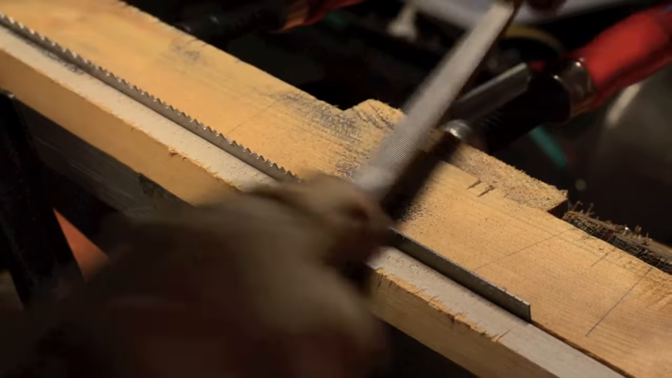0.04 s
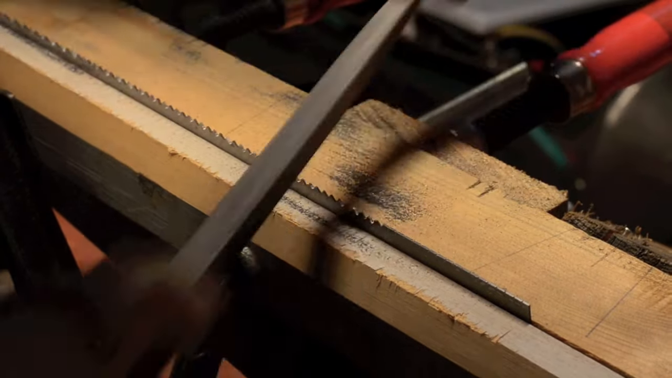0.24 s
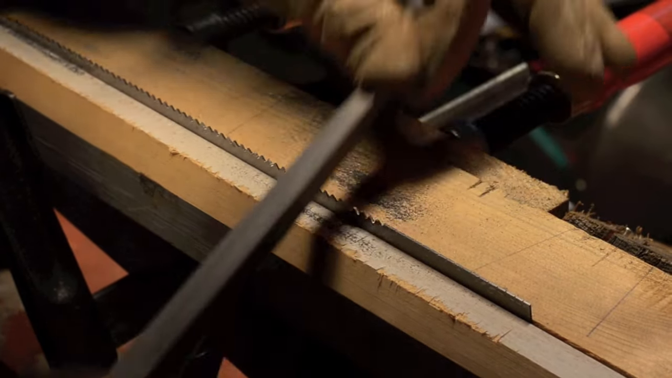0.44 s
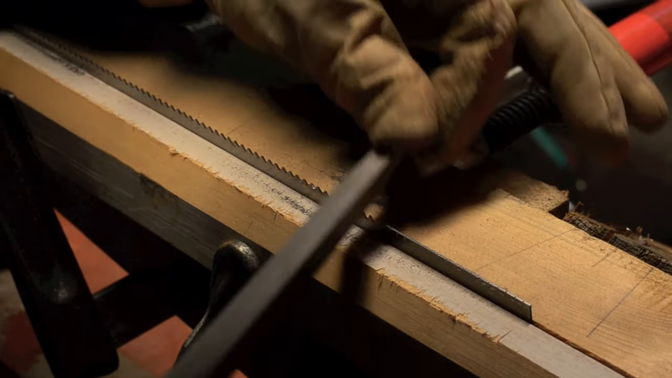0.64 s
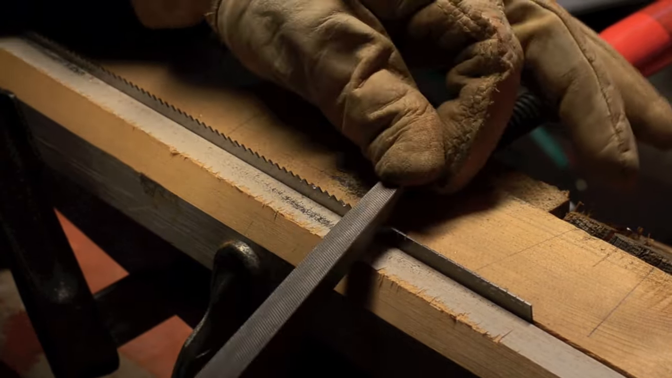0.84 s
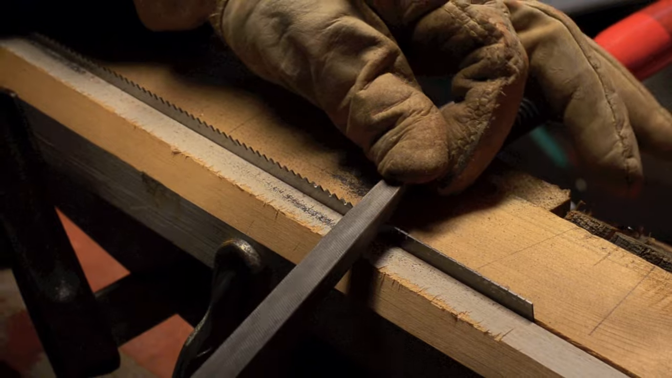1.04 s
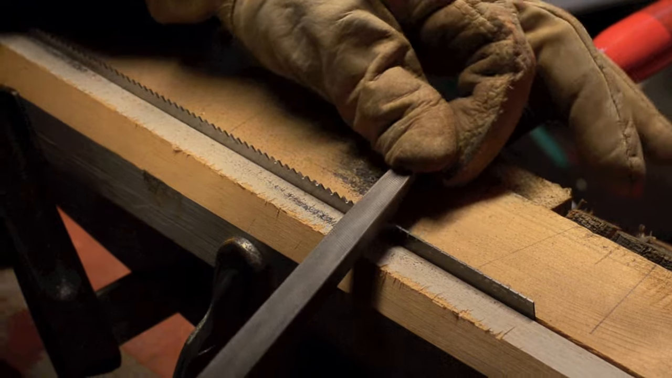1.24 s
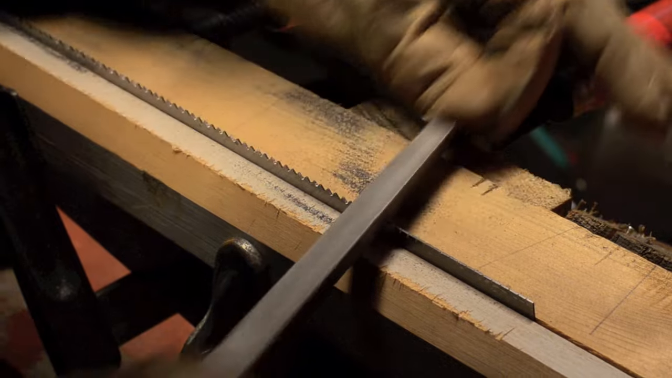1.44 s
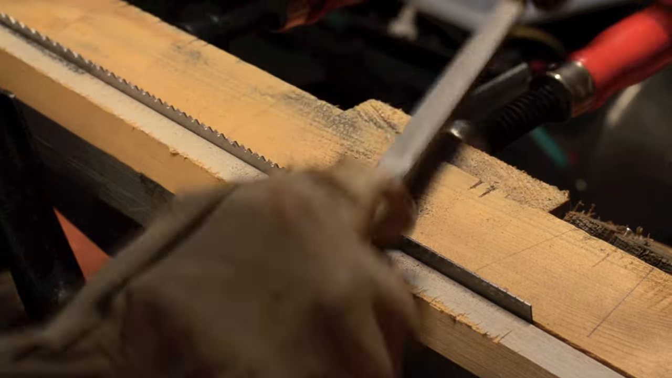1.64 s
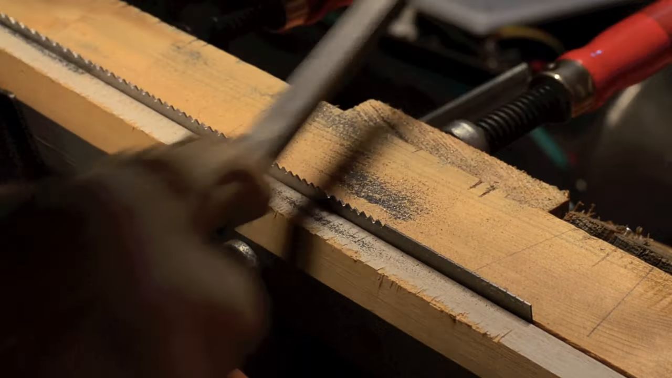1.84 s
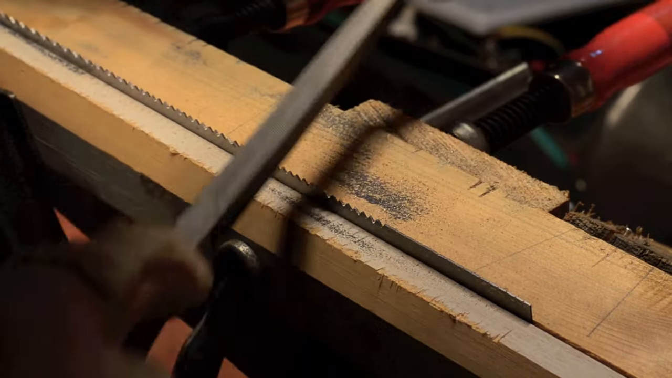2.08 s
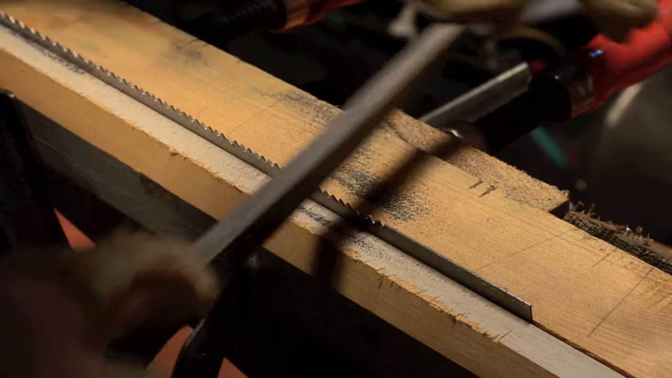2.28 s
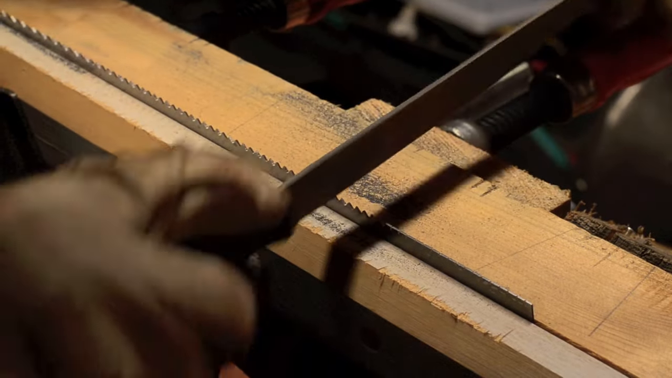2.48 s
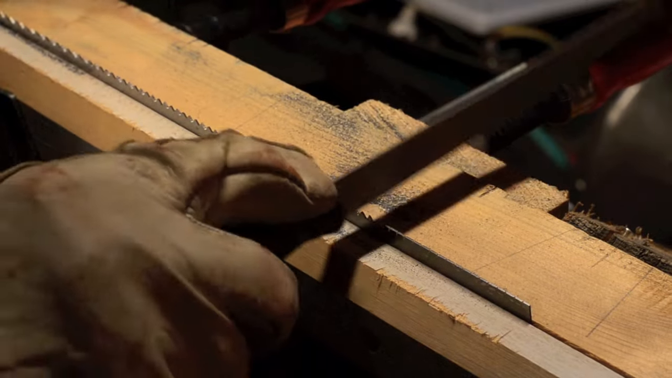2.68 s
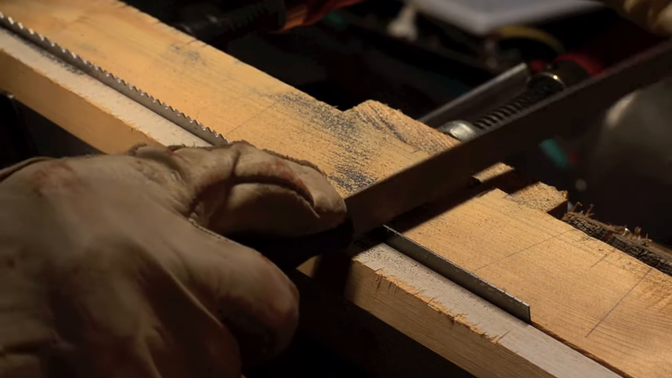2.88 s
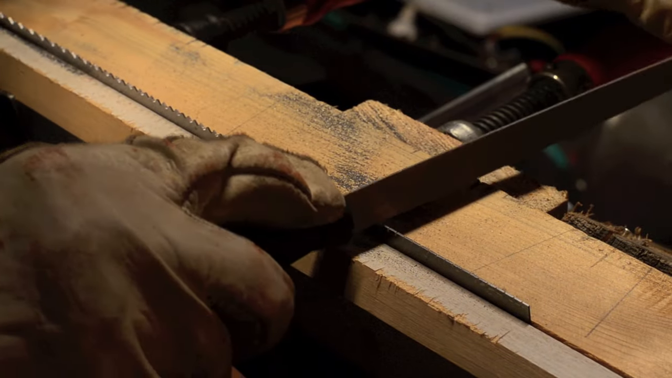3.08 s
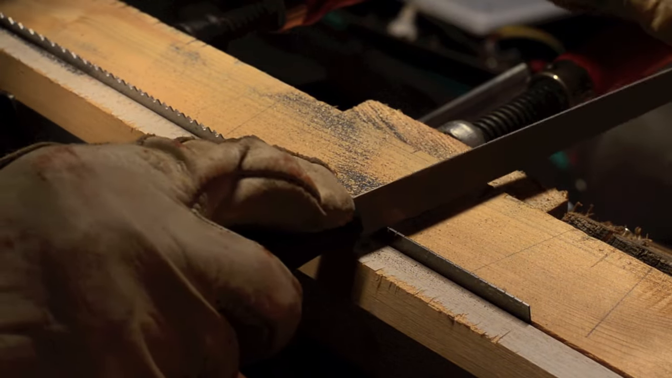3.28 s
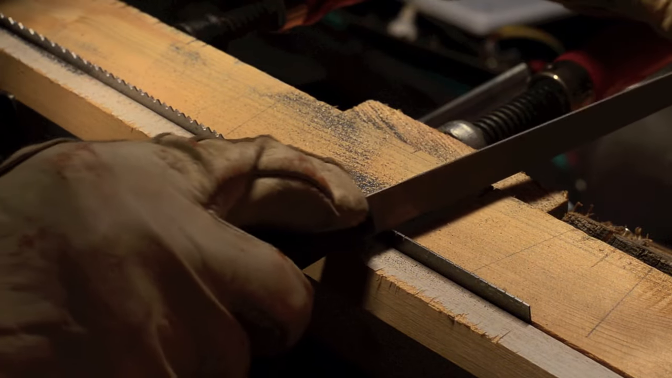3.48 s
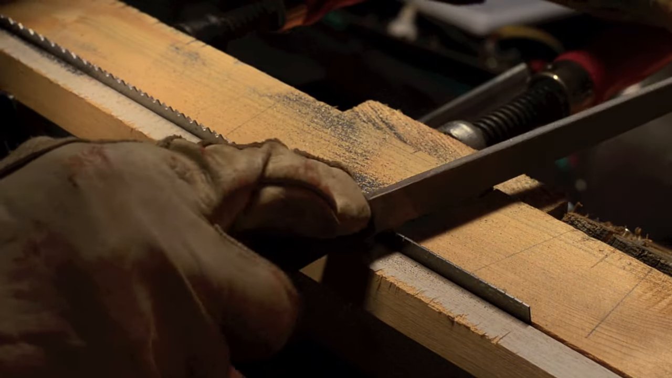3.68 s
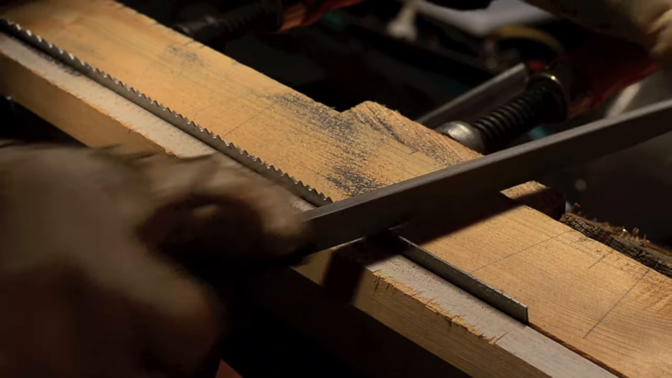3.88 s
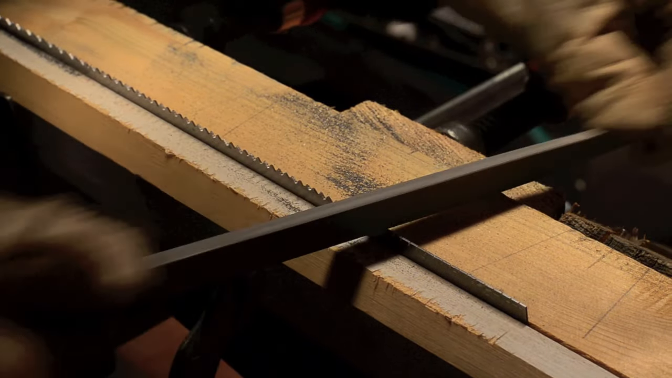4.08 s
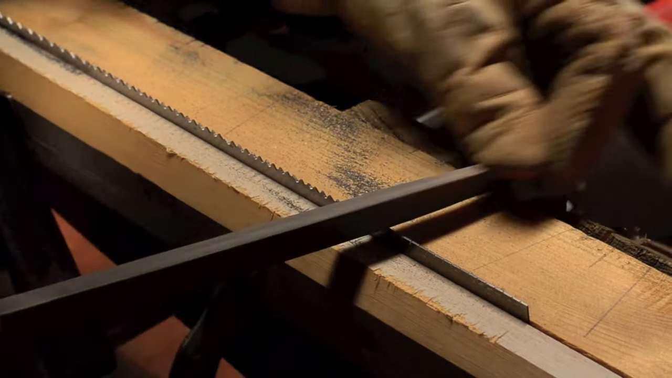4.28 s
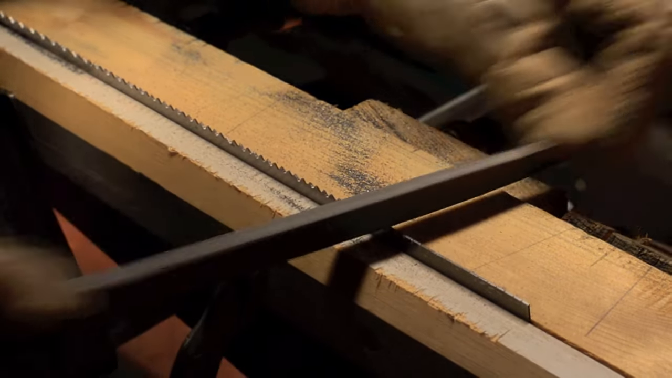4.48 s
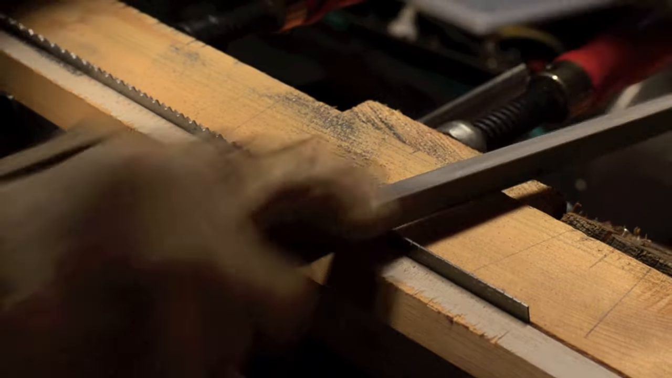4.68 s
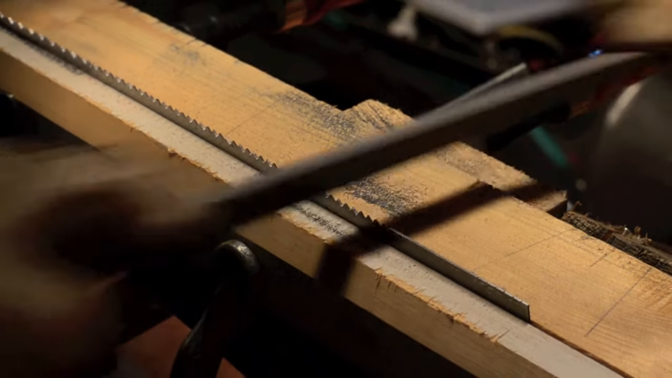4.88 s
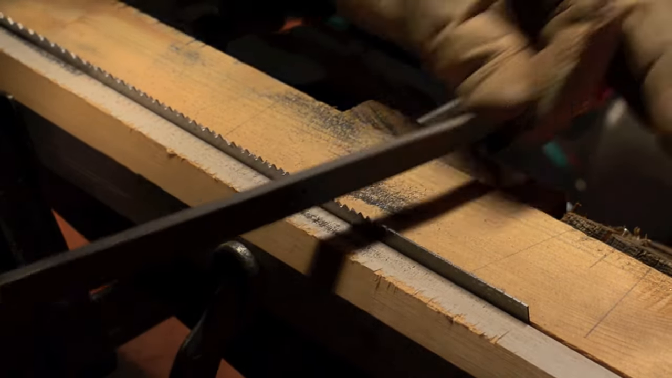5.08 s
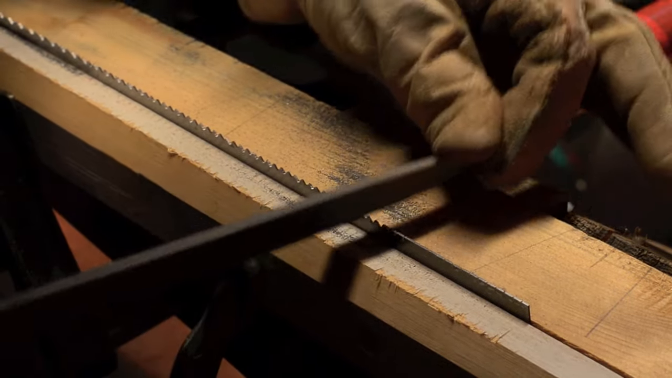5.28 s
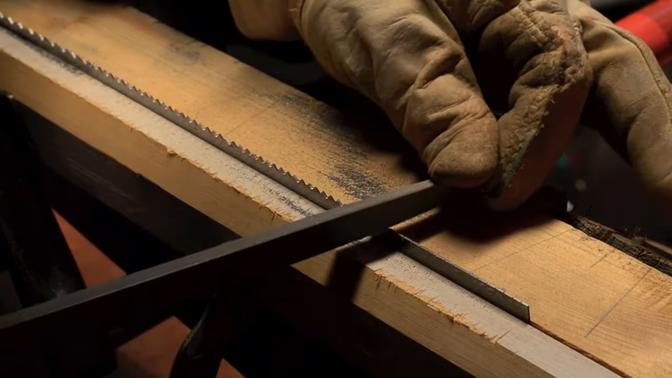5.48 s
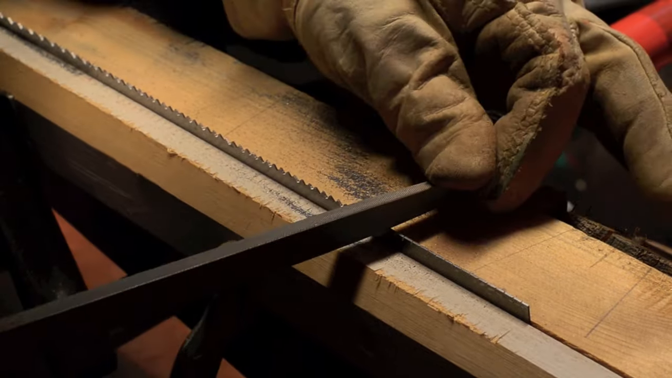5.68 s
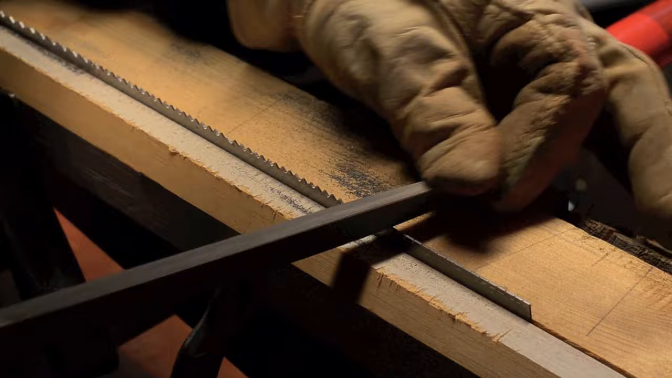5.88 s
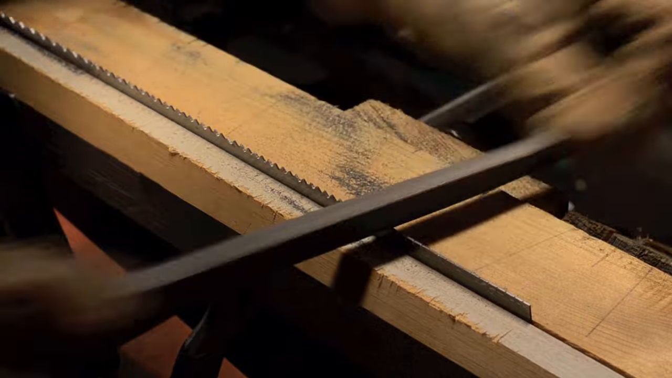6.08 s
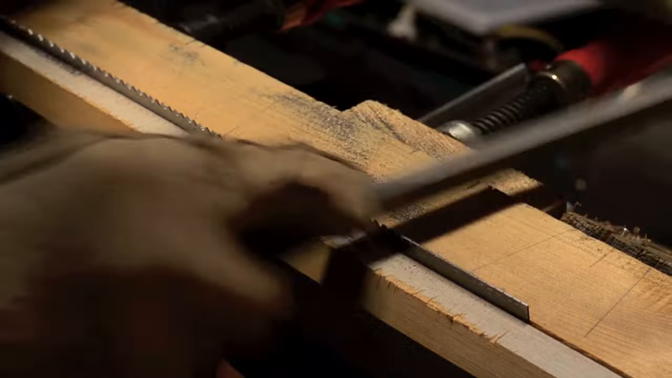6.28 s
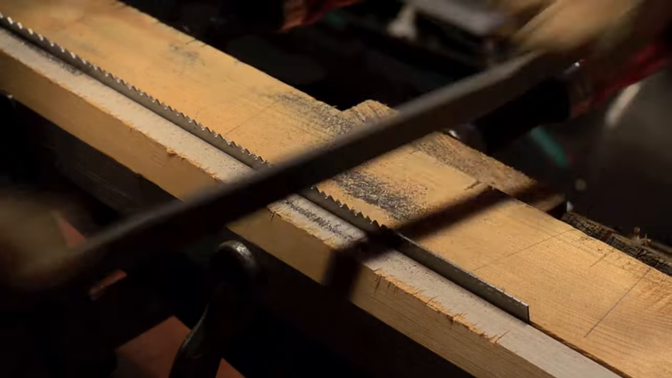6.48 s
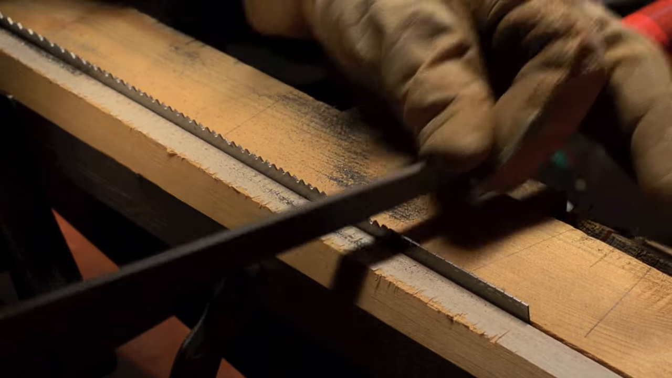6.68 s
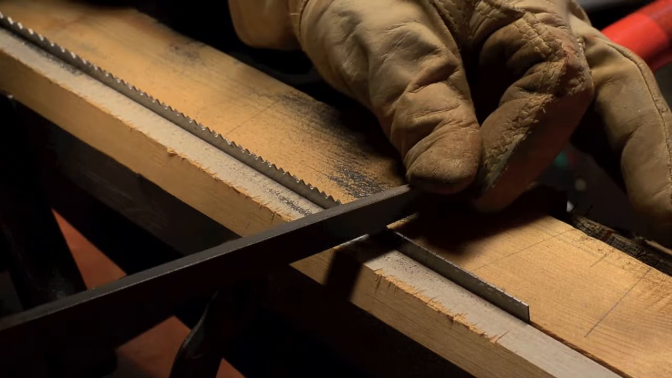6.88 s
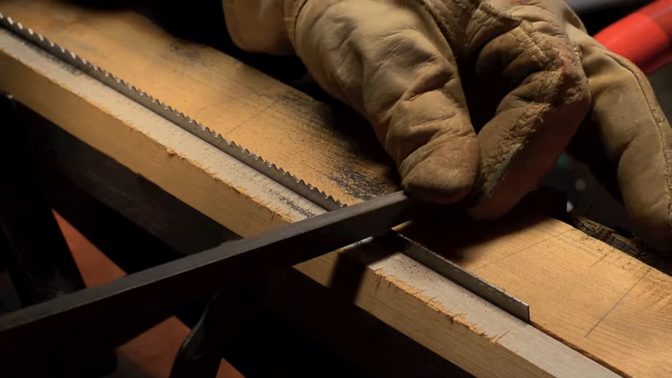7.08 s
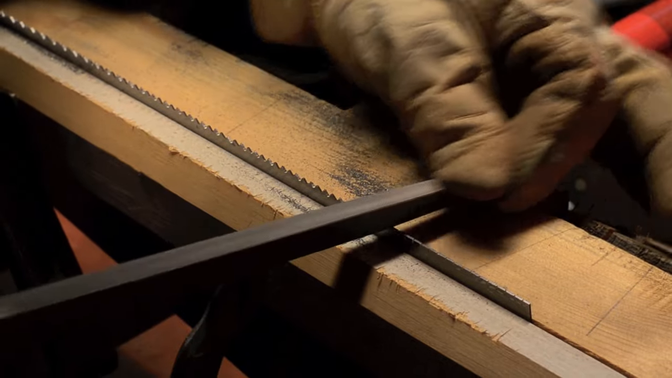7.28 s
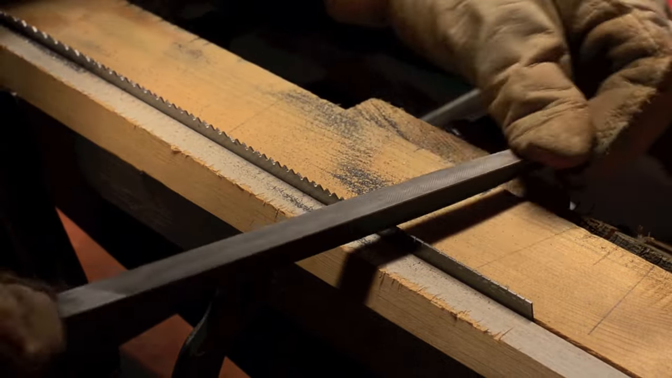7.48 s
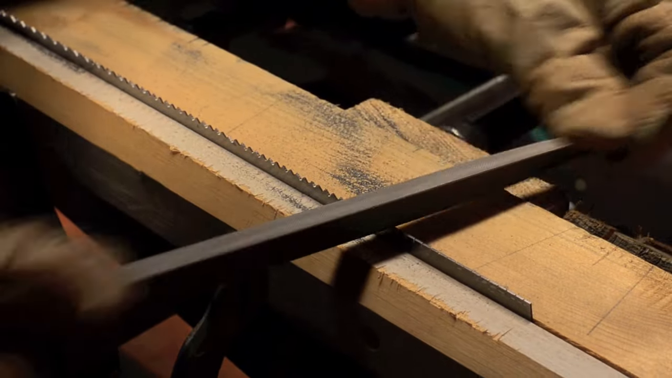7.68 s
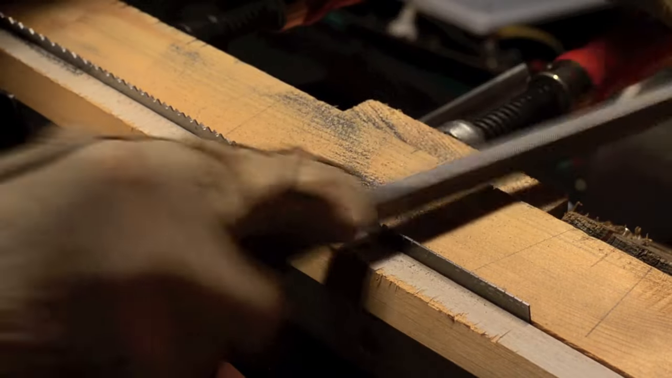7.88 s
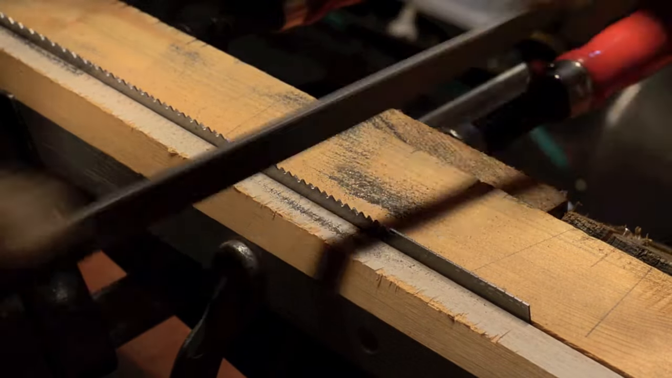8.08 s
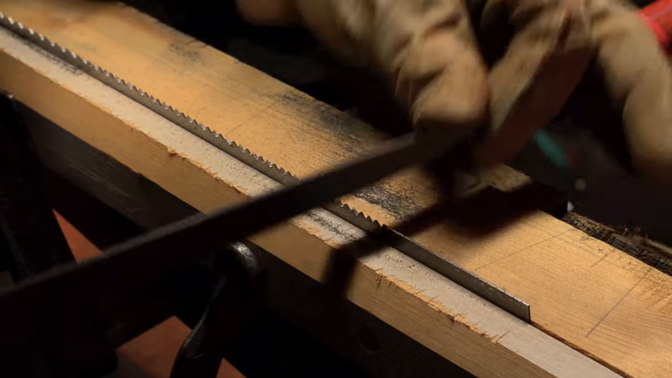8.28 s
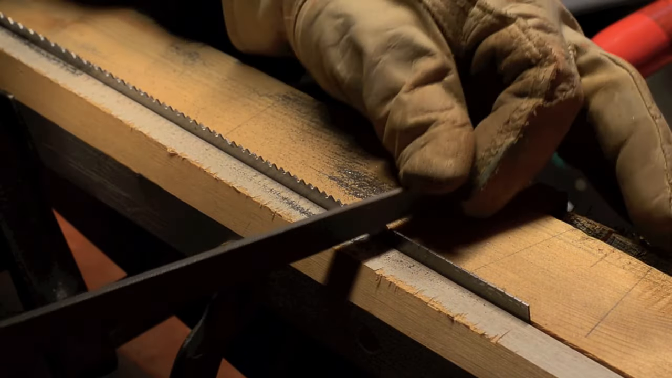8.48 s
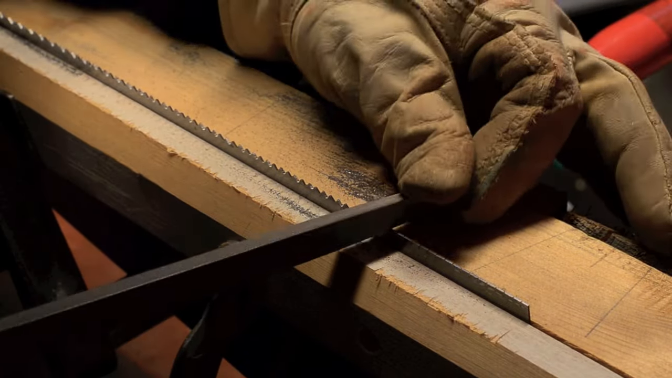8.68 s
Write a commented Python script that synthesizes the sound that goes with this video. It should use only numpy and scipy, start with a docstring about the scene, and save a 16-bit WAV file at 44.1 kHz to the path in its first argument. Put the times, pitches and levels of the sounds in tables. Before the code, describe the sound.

A hand file rasps in slow, separate strokes across a clamped saw blade, squealing at times, with small knocks between passes in a quiet workshop.

```python
"""A hand file works in slow strokes on a saw blade clamped between boards in a small workshop with faint air.
A short rasp opens the scene; knocks and catches then lead into a stroke at 1.4 s that squeals.
A glove rubs softly at 2.5 s, knocks follow, and two strokes come at 3.9 and 4.5 s; another starts at 5.9 s.
Three strokes follow closely from 7.3 s, and a last tap comes at 8.6 s.
Rasp is filtered bites, squeals are stick-slip tones, taps are ringing pushes and the glove is shaped noise."""
import sys
import numpy as np
from scipy import signal
from scipy.fft import rfft, irfft, next_fast_len
from scipy.io import wavfile
from scipy.ndimage import uniform_filter1d, minimum_filter1d

SR = 44100
rng = np.random.default_rng(int(sys.argv[2]) if len(sys.argv) > 2 else 0)


def unload_audio(sound):
    """Save the sound as a 16-bit wav file, at the path given as the first command line argument."""
    columns = np.transpose(np.atleast_2d(sound))
    # keep every value between -1 and 1, then stretch to whole-number steps
    steps = np.round(np.clip(columns, -1, 1) * 32767)
    wavfile.write(sys.argv[1], SR, steps.astype(np.int16))


N = 385427
TIME = np.arange(N) / SR   # seconds


def from_db(db):
    """Turn decibels into an amplitude factor."""
    return 10 ** (np.asarray(db) / 20)


def rms_one(x):
    """Scale a sound to rms 1."""
    return x / np.sqrt(np.mean(x ** 2) + 1e-20)


def at_hz(points, hz):
    """Read a table on a log-frequency axis."""
    known, value = np.transpose(points)
    return np.interp(np.log(np.maximum(hz, 1)), np.log(np.maximum(known, 1)), value)


def butter(x, hz, kind, order=2):
    """Smooth low, high or band filter."""
    sos = signal.butter(order, np.clip(hz, 10, .45 * SR), kind, fs=SR, output="sos")
    return signal.sosfilt(sos, x + 1e-18)


def drift(rate):
    """Random wander of rms 1, with changes up to about rate in Hz."""
    return rms_one(butter(rng.standard_normal(N), rate, "low"))


def gate(times, fade_s):
    """1 between the first and last time, with short ramps outside."""
    return np.clip(1 + np.minimum(TIME - times[0], times[-1] - TIME) / fade_s, 0, 1) ** 2


def colour(x, spectrum=((1, 0),), modes=()):
    """Causal (minimum-phase) filter from a broad spectrum and resonances."""
    size = 2 ** 13
    hz = np.fft.rfftfreq(size, 1 / SR)
    resonances = sum(db / (1 + (2 * (hz - f) / width) ** 2) for f, width, db in modes)
    cepstrum = irfft(np.log(from_db(at_hz(spectrum, hz) + resonances)))
    # folding the cepstrum forward puts all the response after the push
    cepstrum[1:size // 2] *= 2
    cepstrum[size // 2 + 1:] = 0
    response = irfft(np.exp(rfft(cepstrum)))
    return signal.oaconvolve(x, response)[:len(x)]


def register(x, pass_hz, core_hz):
    """One register of a sound, scaled to spread 1 in its core."""
    part = butter(x, pass_hz, "band", order=4)
    return part / np.std(butter(part, core_hz, "band", order=4))


SWELL_CURVE, EASE_CURVE = 1.98, 2.8   # exponents of the rise and fall in dB


def arch(start_s, swell_s, ease_s, swell_db, ease_db):
    """Level in dB around the peak of one push of the hand: it swells, rounds over and eases."""
    past_peak = TIME - start_s - swell_s
    before = np.clip(-past_peak / max(swell_s, 1e-3), 0, 1)
    after = np.clip(past_peak / max(ease_s, 1e-3), 0, 1)
    return -swell_db * before ** SWELL_CURVE - ease_db * after ** EASE_CURVE


# The tone of the room's air. Each row: frequency in Hz, relative strength in dB.
AIR = [(12, -29), (20, 0.5), (54, -14.5), (202, -6.5), (274, -13), (298, 0.5), (324, -17), (404, -3),
       (478, -12.5), (686, -6), (746, -9.5), (1580, -13.5), (15500, -38)]


def air(level_db=-70.5, side_db=-6.0):
    """The faint steady rush of the room is coloured noise, partly different at the two microphones."""
    mid, side = [colour(white, AIR) for white in rng.standard_normal((2, N))]
    return from_db(level_db) * (rms_one(mid) + from_db(side_db) * rms_one(side) * [[1], [-1]])


# How alike the echoes are at left and right. Each row: frequency in Hz, likeness where 1 is the same.
LIKENESS = [(60, 0.71), (300, 0.19), (1200, .84), (3000, .7), (6000, 0.07), (12000, 0.33)]


def stereo_bands(size):
    """Bands of diffuse noise at the two microphones: (centre in Hz, left and right)."""
    mid, side = rfft(rng.standard_normal((2, size)))
    hz = np.fft.rfftfreq(size, 1 / SR)
    edges = np.r_[0, np.geomspace(88, SR / 2, 17)]
    for low, high in zip(edges, edges[1:]):
        centre = (low + high) / 2
        alike = np.clip(at_hz(LIKENESS, centre), -1, 1)
        shared = np.sqrt((1 + alike) / 2) * mid
        opposed = np.sqrt((1 - alike) / 2) * side * [[1], [-1]]
        yield centre, irfft((shared + opposed) * (hz >= low) * (hz < high), size)


# How long the echoes last. Each row: frequency in Hz, time to fall by 60 dB in seconds.
ROOM_T60 = [(100, 0.7), (400, 0.55), (1000, 0.48), (2500, 0.49), (5000, 0.38), (12000, .3)]


def workshop(spread, beamed, beamed_echo_db=-4.5, direct_db=-1.5, echo_db=-2.0,
             early_db=2.0, early_s=0.036, gap_s=0.0019, lag_s=.00005):
    """Sound arrives left first, then dense echoes die away by band, weaker for tones beamed forward."""
    direct = spread + beamed
    to_walls = spread + from_db(beamed_echo_db) * beamed
    age = TIME[:SR * 3 // 4]
    tail = sum(noise * from_db(-60 * age / at_hz(ROOM_T60, hz)) for hz, noise in stereo_bands(len(age)))
    # the echoes begin after a gap, and the early ones are stronger
    tail *= np.clip(age / gap_s - 1, 0, 1) * from_db(early_db * np.exp(-age / early_s))
    tail /= np.sqrt(np.mean(np.abs(rfft(tail, SR)[:, 400:4000]) ** 2))   # even gain, 400 to 4000 Hz
    size = next_fast_len(N)
    hz = np.fft.rfftfreq(size, 1 / SR)
    right = irfft(rfft(direct, size) * np.exp(-2j * np.pi * hz * lag_s))[:N]
    echoes = signal.oaconvolve(to_walls[None], tail, axes=1)[:, :N]
    return from_db(direct_db) * np.array([direct, right]) + from_db(echo_db) * echoes


# The tone of leather on the handle. Each row: frequency in Hz, relative strength in dB.
GLOVE_COLOUR = [(24, -39), (40, -8), (201, 2), (308, -5), (599, 1.5), (663, -1), (973, 4), (5000, -25),
                (6500, -63), (11000, -120)]


def glove(start_s=2.45, swell_s=0.095, ease_s=0.084, peak_db=-59, swell_db=10, ease_db=18, crease_db=-1.0):
    """Leather rubs softly on the handle as the grip shifts: uneven coloured noise in one swell."""
    rub = colour(rng.standard_normal(N) * from_db(crease_db * drift(70)), GLOVE_COLOUR)
    level = peak_db + arch(start_s, swell_s, ease_s, swell_db, ease_db)
    return gate([start_s, start_s + swell_s + ease_s], fade_s=0.018) * from_db(level) * rms_one(rub)


# The file knocks or catches on the saw. Each row: start in seconds, peak of the knock in dB,
# crack in dB beside the knock (before crack_db is added), ring in Hz, fading time of the crunch in seconds.
TAPS = [(0.8509, -25, -41, 1554, 0.0009), (0.9494, -38, -33, 810, 0.001), (1.0831, -43, -3, 1540, 0.0039),
        (1.1311, -34, 6.5, 1450, 0.01), (1.1538, -33.5, 8.5, 1160, 0.011), (1.169, -30.5, 1, 1400, 0.0095),
        (1.22, -27, -0.5, 1180, 0.0059), (1.255, -29.5, -7, 1180, 0.0038), (1.3145, -25, -1, 1340, 0.011),
        (2.9764, -49.5, -35, 701, 0.012), (3.3031, -24.5, -17, 1051, 0.0011),
        (3.4778, -36, -34, 1010, 0.006), (3.784, -41, -6, 1320, 0.02), (5.485, -20.5, -20, 1580, 0.0017),
        (5.575, -41.5, -32, 645, 0.017), (5.8941, -34.5, -9, 1590, 0.0045),
        (6.8885, -20, -26, 1530, 0.0011), (7.5548, -15, 0, 1070, 0.0029),
        (7.5711, -14.5, -6.5, 1210, 0.0065), (8.5959, -29, -38.5, 1430, 0.0014)]
# The tone of a knock. Each row: frequency in Hz, relative strength in dB.
TAP_COLOUR = [(59, -60.5), (100, -19), (333, -11.5), (619, 0.5), (1130, -4.5), (1250, -10.5), (1650, -4.5),
              (1900, -6.5), (3540, -20.5), (4870, -43.5), (12000, -60.5), (15600, -85), (22000, -120)]


def taps(gain_db=0.0, crack_db=10.5, crunch=.05, grit_per_s=6.2, ring_width_hz=550, ring_db=9.5,
         thin_hz=300, crack_top_hz=5200):
    """A sharp push and a crunch ring at the contact's pitch; longer crunches are grittier; a crack is added."""
    out, age = np.zeros(N), TIME[:SR // 16]
    for start, db, treble_db, ring_hz, crunch_s in TAPS:
        grit = crunch + grit_per_s * crunch_s
        push = grit * rng.standard_normal(len(age)) * np.exp(-age / max(crunch_s, 1e-4))
        push[0] = -1
        ringing = colour(push, TAP_COLOUR, [(ring_hz, ring_width_hz, ring_db)])
        # the light file barely moves the heavy bench
        knock = butter(ringing, thin_hz, "high", order=1)
        bright = butter(butter(push, 2600, "high"), [2600, crack_top_hz], "band", order=1)
        crack = from_db(treble_db + crack_db) * bright
        at = round(start * SR)
        out[at:at + len(age)] += from_db(db + gain_db) * (knock / np.abs(knock).max() + crack)
    return out


def stick_slip(spells, gain_db, jitter_hz, flutter_db, flutter_per_jitter_db, octave_db, fade_s):
    """The contact sticks and slips once a cycle, gliding; uneven slips widen the tone into a flutter."""
    uneven, flutter = drift(jitter_hz), drift(160)
    out = np.zeros(N)
    for start, length, first_hz, last_hz, db, growth_db, jitter in spells:
        contact = gate([start, start + length], fade_s)
        on = contact > 0
        along = np.clip((TIME[on] - start) / length, 0, 1)
        glide = first_hz + (last_hz - first_hz) * along
        pitch = glide * (1 + jitter * (uneven[on] - uneven[on].mean()))
        phase = 2 * np.pi * np.cumsum(pitch) / SR
        tone = np.sin(phase) + from_db(octave_db) * np.sin(2 * phase)
        tone *= from_db((flutter_db + flutter_per_jitter_db * jitter) * flutter[on])
        level = gain_db + db + growth_db * (along - .5)
        out[on] += contact[on] * from_db(level) * rms_one(tone)
    return out


# Low drumming spells. Each row: start in seconds, length in seconds, first pitch in Hz, last pitch in Hz,
# level in dB before the gain, growth from start to end in dB, pitch jitter as a share of the pitch.
DRUMMING = [ (0.0, 0.012, 749, 714, -31, -9.5, 0.057), (1.69, .045, 894, 736.6, -28.5, 4.5, 0.047),
            (4.15, .095, 469, 597.4, -31.5, 3, .085), (4.312, .041, 988.5, 1116, -25.5, 7, 0.05),
            (4.68, 0.017, 1361, 1270, -22, 1.5, .06), (6.19, 0.08, 1653, 1130, -21, 2.5, 0.047),
            (7.81, 0.054, 1290, 845, -22, 13, .05), ]


def drumming():
    """Ridges drum in step when the file runs slowly, as a low stick-slip tone."""
    return stick_slip(DRUMMING, gain_db=1.0, jitter_hz=253, flutter_db=1.5,
                      flutter_per_jitter_db=24.5, octave_db=-18.5, fade_s=.008)


# High squeals of the blade. Each row: start in seconds, length in seconds, first pitch in Hz, last pitch in Hz,
# level in dB before the gain, growth from start to end in dB, pitch jitter as a share of the pitch.
SQUEALS = [ (0.0, 0.026, 3783, 3830, -22, -7.5, 0.077), (1.435, 0.04, 2830, 2854, -28.5, 7.5, 0.064),
           (1.49, 0.082, 3990, 3430, -22, -1, 0.11), (1.572, 0.033, 2900, 2570, -17, -3, 0.035),
           (1.61, 0.041, 2620, 2830, -23.5, 2, 0.054), (4.458, 0.21, 4564, 4410, -29.5, 5.5, .08),
           (4.705, 0.026, 4635, 4500, -23, -3, 0.12), (4.737, 0.019, 2524, 2547, -15.5, 1.5, .022),
           (5.877, .019, 2747, 2470, -40.5, 2.5, 0.016), (5.938, 0.1, 2358, 2255, -24.5, 11, 0.048),
           (6.05, 0.12, 2290, 2482, -19, 5.5, 0.036), (6.288, 0.018, 2450, 2533, -19, 9, 0.11),
           (7.246, 0.017, 2440, 2780, -40.5, -1.5, .015), (7.305, 0.078, 2360, 2290, -29, 11, 0.085),
           (7.382, 0.062, 2255, 2308, -18.5, 0.5, .011), (7.465, 0.032, 2445, 2700, -23, -2.5, 0.074),
           (7.585, 0.14, 2750, 2647, -33, -17, 0.029), (7.725, .033, 2710, 2620, -18, 8.5, .012),
           (7.764, .032, 2520, 2170, -18.5, 1, .015), (7.8, 0.066, 2110, 2118, -20, -8.5, 0.05), ]


def squeals():
    """The blade squeals in stick-slip, as a high and uneven tone."""
    return stick_slip(SQUEALS, gain_db=-0.5, jitter_hz=379.6, flutter_db=1.5,
                      flutter_per_jitter_db=44.5, octave_db=-21, fade_s=.007)


BOARDS_FOLLOW, BENCH_FOLLOW, HISS_FOLLOW = 0.61, .2, 0.92   # share of the arch that each part follows
BOARDS_SAG_DB_PER_S, BENCH_SAG_DB_PER_S = 3, 12.5   # boards and bench fade as the file travels
BRAKE_S = 0.032   # the file slows at the end of a stroke
BRAKE_HISS_DB, BRAKE_BOARDS_DB = 4, 7.5   # and the cut dulls and thins
LIFT_S = 0.005   # the file leaves the tooth
EDGE_HZ = 1590   # above this the blade's brightness changes over the stroke

# Strokes and nudges of the file. Each row: start in seconds, swell length in seconds, ease length in seconds,
# peak of the rasp in dB, rise of the swell in dB, fall of the ease in dB,
# then boards, bench and hiss in dB beside that peak (all levels before the gains in rasp()),
# brightening towards the peak in dB (negative dulls it), settling time just before the start in seconds.
STROKES = [ (0.0, 0.0083, 0.022, -19.5, -2.5, 7, -4.5, -27.5, -3, 1, .004),
           (1.136, 0.025, 0.24, -45.5, -0.5, -2, -4.5, -14, -13.5, 6, 0.018),
           (1.388, .22, 0.082, -20, 17, 2, -11.5, -33.5, 0.5, 6, .045),
           (3.469, .006, 0.012, -47.5, 1.5, 18, -4.5, -20, -15, 14.5, 0.0058),
           (3.859, 0.34, 0.17, -29, 8, 4.5, -4, -36, -10, 8.5, 0.037),
           (4.458, 0.18, 0.089, -15.5, 23.5, 6.5, -13, -36, -9, 0.5, .012),
           (5.948, .22, 0.1, -17.5, 26.5, 2, -16, -36.5, -7.5, -3.5, 0.055),
           (7.013, .05, 0.038, -50.5, -1.5, 5.5, 0.5, -26.5, -16, 9, .004),
           (7.258, 0.18, 0.086, -23, 26.5, 13.5, -9.5, -27, -9, -1, 0.048),
           (7.571, 0.012, 0.055, -21, -3, 10.5, -8.5, -25, -8, -5, 0.0055),
           (7.724, 0.11, 0.033, -15, 20, 4.5, -15.5, -39.5, -9.5, -4.5, .006), ]
# The file's own resonances and notches change with grip and tooth: one list a stroke.
# Each row in a list: frequency in Hz, width in Hz, boost (or cut if negative) in dB.
GRIP_MODES = [
    [(322, 16, 7), (600, 96, -6), (702, 52, 14), (2440, 260, -3.5)],
    [(324, 22, 9), (604, 110, -10.5), (2500, 176, -8.5), (3140, 560, 9)],
    [(277, 25, 4), (1050, 80, -2), (1470, 81, 4.5), (2070, 270, 7.5), (2840, 170, 0.5), (3870, 460, -1.5)],
    [(458, 31, -15.5), (594, 20, 21), (968, 530, 11.5), (1297, 40, -8.6)],
    [(570, 150, 1), (754, 53, 1), (1068, 21, 14.5), (1470, 120, -2), (2410, 600, 2.5), (2863, 110, -4),
     (3400, 110, 3.5)],
    [(460, 22, -2.5), (811, 48, 1), (1040, 86, -4.5), (1804, 350, 2), (2660, 240, 1.5), (4800, 360, 2.5)],
    [(335, 28, 8.5), (596, 30, -8), (1460, 104, -2.5), (1820, 72, 6), (3770, 330, -4), (4550, 380, 6.5)],
    [(420, 65, -9), (624, 32, 9), (1137, 96, -3), (1830, 258, 6)],
    [(350, 69, 7), (465, 65, -6.5), (580, 31, -2.5), (715, 160, -8), (3619, 507, -3.5), (4840, 1300, 5)],
    [(670, 90, -19.5), (850, 31, 8.5), (2120, 120, -6), (2940, 97, 8.5)],
    [(500, 18, -4), (635, 120, -2), (689, 15, 4), (843, 58, 4), (3567, 499, 0.5), (6411, 660, 4.5)],
]
# The broad tone of the bites. Each row: frequency in Hz, relative strength in dB.
RASP = [(30, -37.5), (65, -26), (140, -26), (300, -22), (450, -12.5), (800, -1), (1300, 1), (2000, -3.5),
        (2700, -7), (4500, -29.5), (7000, -29.5), (10000, -46), (12500, -40), (15000, -52.5)]
# Resonances and notches of the clamped saw. Each row: frequency in Hz, width in Hz, boost or cut in dB.
SAW_MODES = [(273.7, 35, 13), (315, 50, -3), (343, 30, 2), (402, 24, 4.5), (436, 39, 7.5), (482, 58, 5.5),
             (642, 40, 2.5), (687, 29, -11.5), (828, 210, 3.5), (886, 40, 4), (907, 40, -8), (1120, 21, -3),
             (1231, 180, 9.5), (1257.6, 31, -12.5), (1365, 60, -8), (1860, 200, 10), (1912, 150, -13.5),
             (2280, 51, 7.5), (2500, 90, 1.5), (2965, 36, -4.5), (3230, 197, -5), (3660, 62, -3.5),
             (4260, 168, 5), (4630, 670, 7), (5630, 450, 7), (6540, 1600, -3.5)]


def rasp(bites_per_s=7000, size_db=2.5, judder_db=1.67, judder_hz=150, rasp_db=-2.0, boards_db=-2.0,
         bench_db=-4.0, hiss_db=-1.5, sizzle_db=-3.5, sizzle_growth=1.58, stutter_db=2.5, stutter_hz=45,
         firm_db=-28.0, firm_range_db=12.5):
    """Ridges bite the tooth at random with juddering force; every bite rings saw, boards, bench and file."""
    sizes = from_db(size_db * np.minimum(rng.exponential(1, N), 5)) * rng.choice([-1, 1], N)
    bites = sizes * (rng.random(N) < bites_per_s / SR) * from_db(judder_db * drift(judder_hz))
    ringing = colour(bites, RASP, SAW_MODES)
    blade = register(ringing, [650, 3200], [650, 2000])
    boards = register(ringing, [200, 650], [200, 650])
    bench = register(ringing, [20, 200], [30, 200])
    hiss = register(ringing, [3200, 8500], [3200, 8500])
    sizzle = register(ringing, [8500, 19000], [8500, 15000])
    body, edge = [butter(butter(blade, EDGE_HZ, kind), EDGE_HZ, kind) for kind in ("low", "high")]
    stutter = stutter_db * drift(stutter_hz)
    out = np.zeros(N)
    for stroke, modes in zip(STROKES, GRIP_MODES):
        start, swell_s, ease_s, peak, swell_db, ease_db, low, deep, high, bright_db, settle_s = stroke
        end = start + swell_s + ease_s
        on = (TIME > start - .1) & (TIME < end + .15)
        effort = arch(start, swell_s, ease_s, swell_db, ease_db)[on]
        brightness = arch(start, swell_s, ease_s, bright_db, bright_db)[on]
        past_peak = TIME[on] - start - swell_s
        braking = np.clip(1 + (TIME[on] - end) / BRAKE_S, 0, 1)
        boards_level = peak + low + BOARDS_FOLLOW * effort
        boards_level -= BOARDS_SAG_DB_PER_S * past_peak + BRAKE_BOARDS_DB * braking
        bench_level = peak + deep + BENCH_FOLLOW * effort - BENCH_SAG_DB_PER_S * past_peak
        hiss_level = peak + high + HISS_FOLLOW * effort + brightness - BRAKE_HISS_DB * braking
        mix = from_db(peak + effort + rasp_db) * (body[on] + from_db(brightness) * edge[on])
        mix += from_db(boards_level + boards_db) * boards[on]
        mix += from_db(bench_level + bench_db) * bench[on]
        mix += from_db(hiss_level + hiss_db) * hiss[on]
        # a keener cut raises the top octave faster than the hiss
        mix += from_db(sizzle_growth * hiss_level + sizzle_db) * sizzle[on]
        # under light pressure the file skips and catches
        lightness = np.clip((firm_db - peak - effort) / firm_range_db, 0, 1)
        ramps = np.minimum((TIME[on] - start) / settle_s, (end - TIME[on]) / LIFT_S)
        contact = np.clip(1 + ramps, 0, 1) ** 2 * from_db(lightness * stutter[on])
        out[on] += colour(contact * mix, modes=modes)
    return out


# The right microphone hears a little more of the bench. Each row: frequency in Hz, left minus right in dB.
LEAN = [(60, -3), (300, -3), (700, -1.47), (5000, -1.5), (12000, 0)]


def scene():
    """File, saw and glove sound in the workshop, over its faint air."""
    tones = squeals() + drumming()
    left, right = workshop(rasp() + taps() + glove(), tones) + air()
    return np.array([left, colour(right, [(hz, -db) for hz, db in LEAN])])


def limiter(x, ceiling_db=-5.0, release_db_per_s=150, ahead_s=0.0005):
    """Turns the loudest peaks down just before they come, and recovers quickly."""
    over = np.maximum(20 * np.log10(np.abs(x).max(0) + 1e-9) - ceiling_db, 0)
    release = release_db_per_s * TIME
    held = np.maximum.accumulate(over + release) - release
    size = 2 * int(ahead_s * SR) + 1
    return x * from_db(uniform_filter1d(minimum_filter1d(-held, size), size))


def record(dry, cutoff_hz=15750):
    """Peaks are held down and the top is cut steeply."""
    steep = signal.ellip(12, .1, 80, cutoff_hz, fs=SR, output="sos")
    return signal.sosfilt(steep, limiter(dry))


dry = scene()
out = record(dry)
unload_audio(out)
```